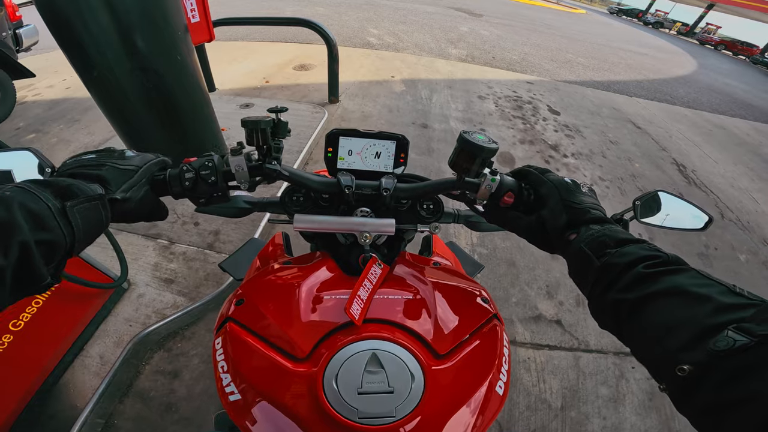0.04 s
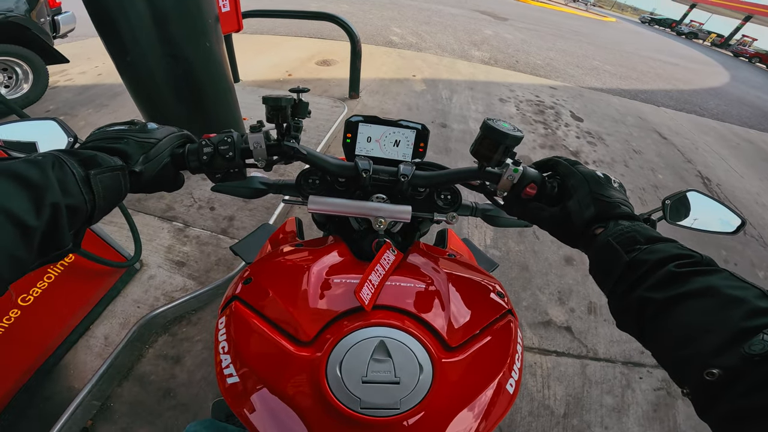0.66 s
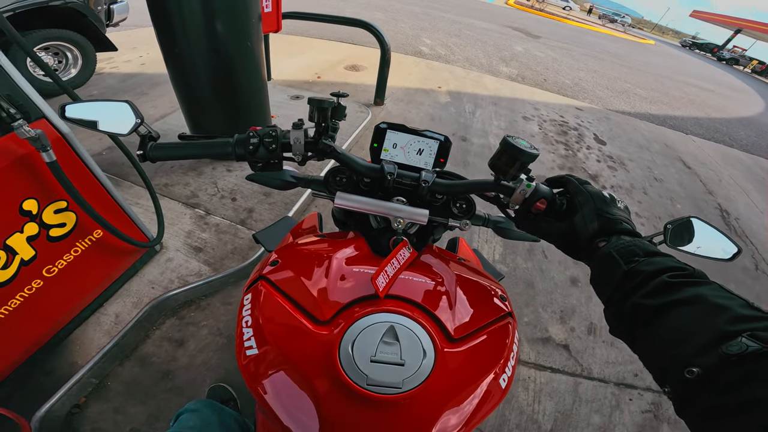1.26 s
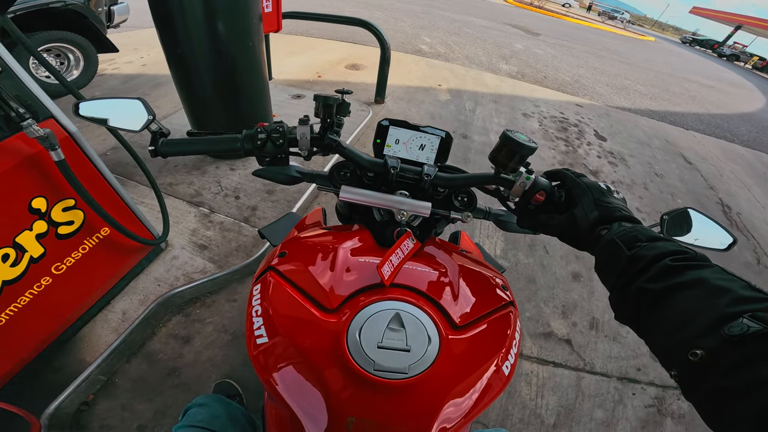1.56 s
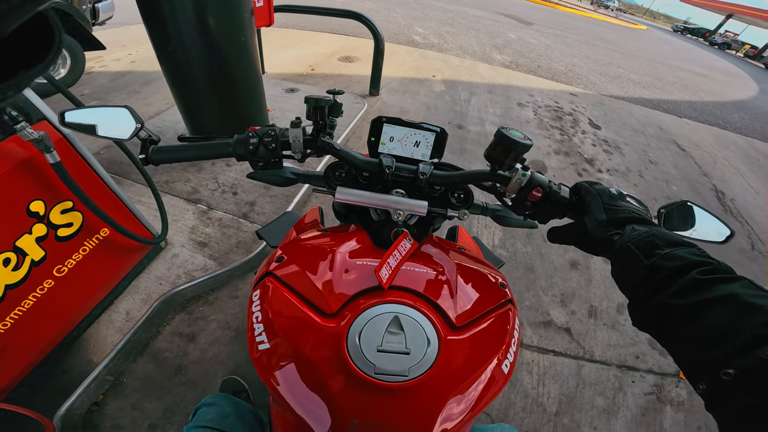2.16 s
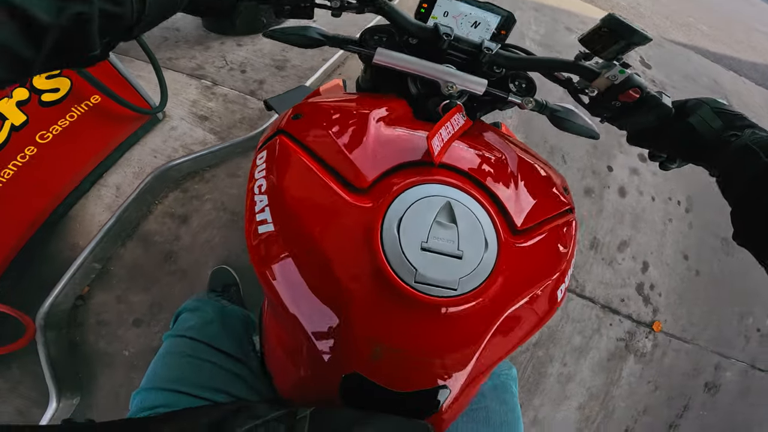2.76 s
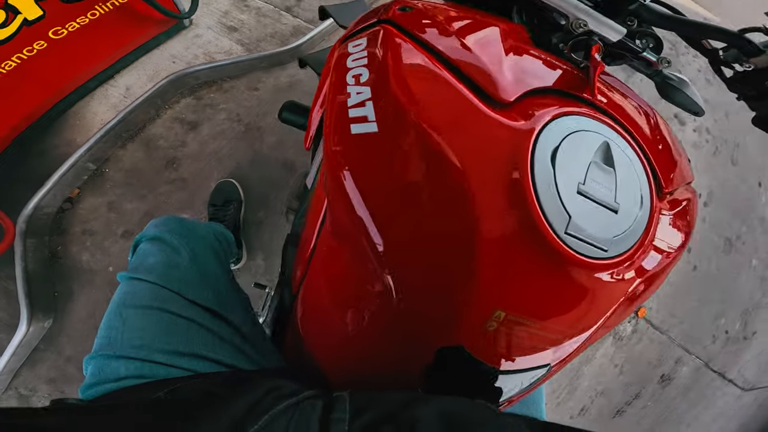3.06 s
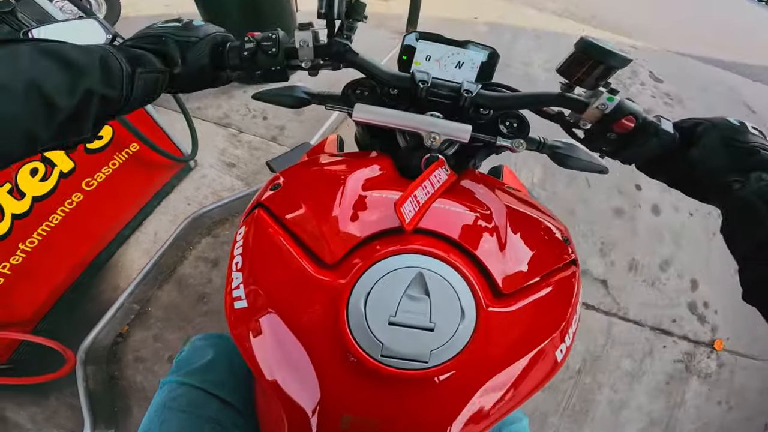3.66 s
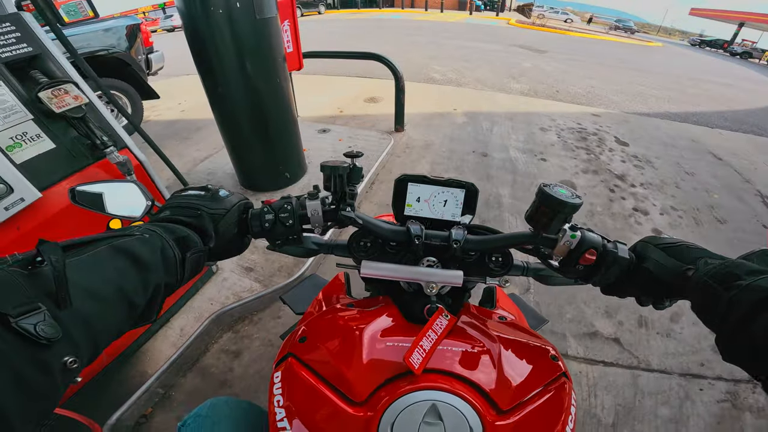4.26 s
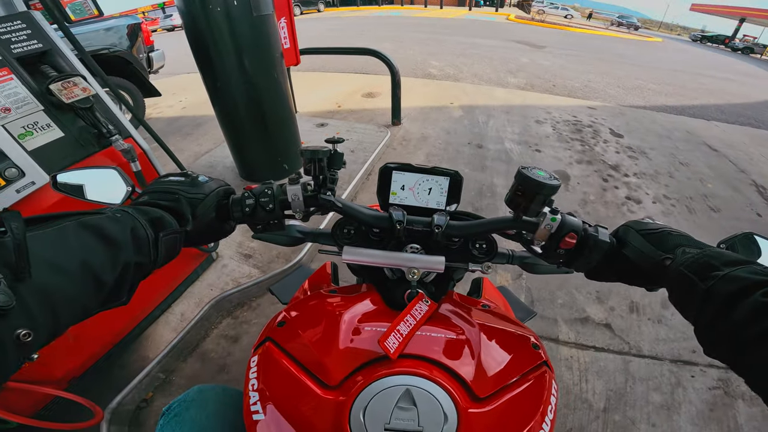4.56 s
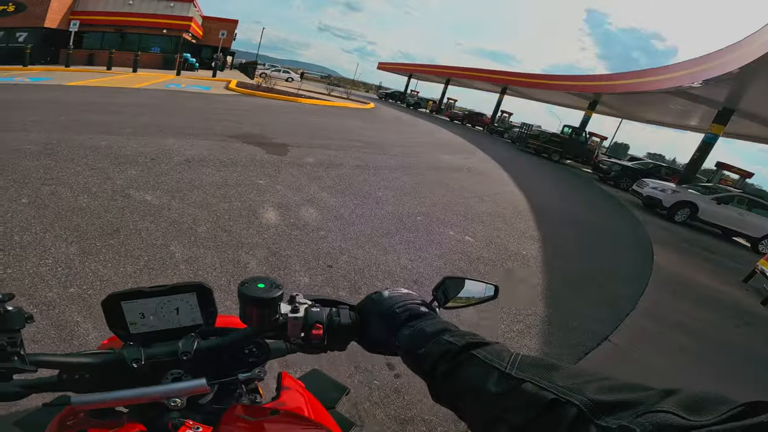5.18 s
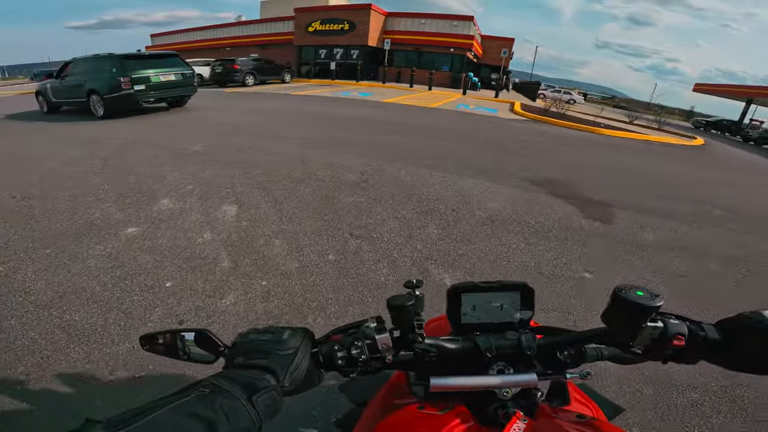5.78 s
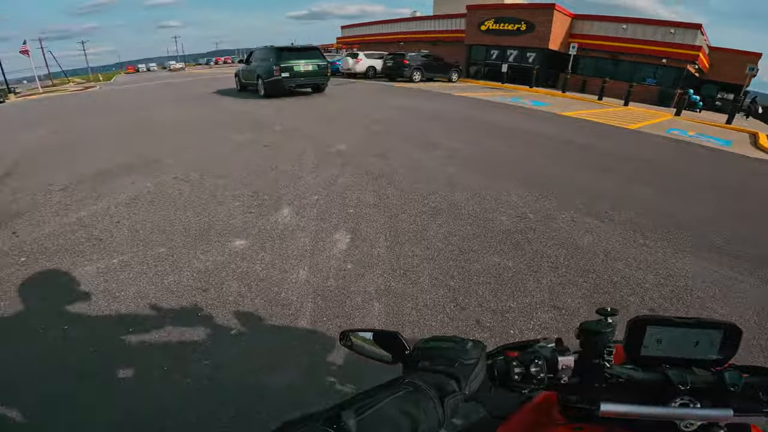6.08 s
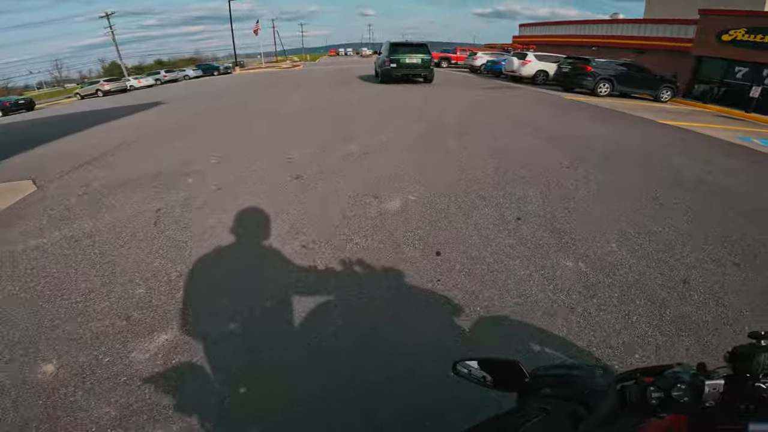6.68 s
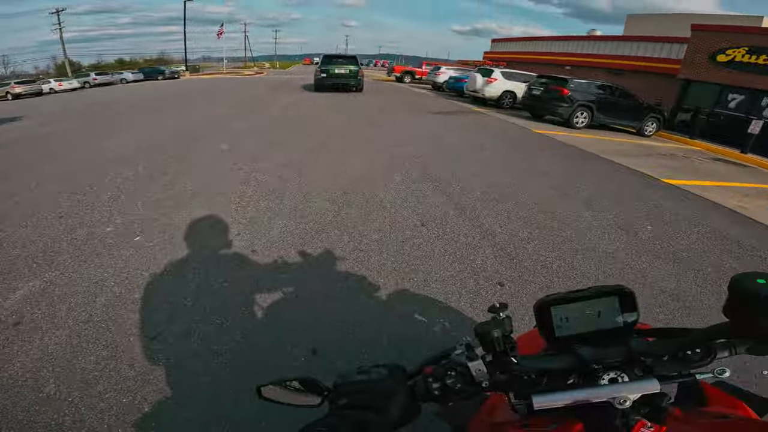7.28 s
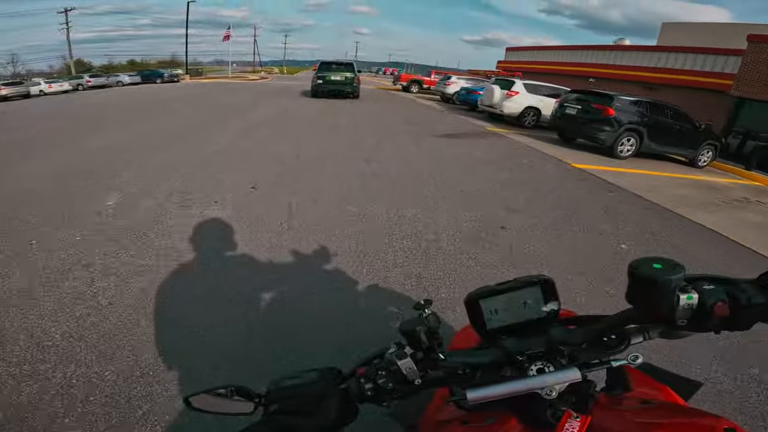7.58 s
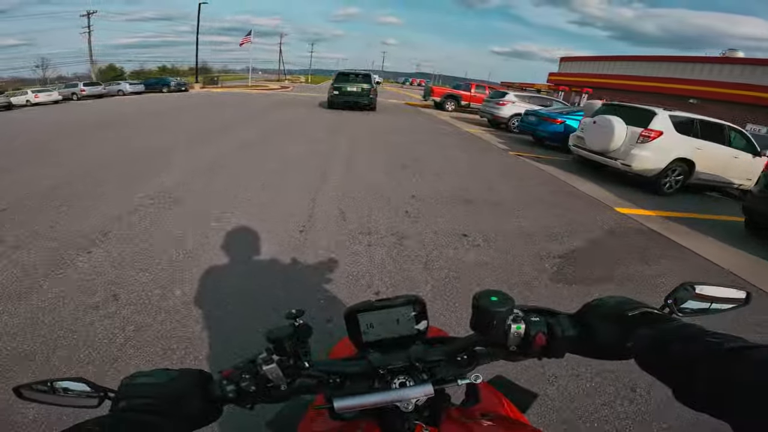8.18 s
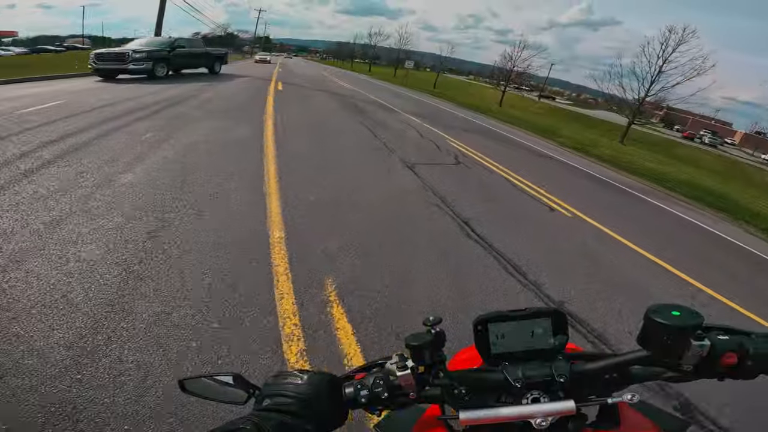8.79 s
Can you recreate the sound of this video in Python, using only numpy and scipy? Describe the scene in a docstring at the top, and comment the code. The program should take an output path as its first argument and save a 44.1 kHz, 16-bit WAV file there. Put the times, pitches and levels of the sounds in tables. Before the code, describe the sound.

Close up, a motorcycle starts with a grinding whine, settles into a deep uneven idle, then rides off with rising revs.

```python
"""A filling station forecourt, microphone on the rider's chest, an arm's length above a V4 motorcycle.
The starter grinds, the engine catches and settles into a lumpy idle, then pulls away under load, revs up
and falls back on a closed throttle; then an abrupt cut to the bike pulling on the road. Each firing
puffs through the pipes and silencer, gears whine and the valve train clatters in the case. The pump
island throws the idle back; traffic and a low hum fade down as the engine starts and idles."""
import sys
import numpy as np
from scipy import signal
from scipy.fft import rfft, irfft
from scipy.io import wavfile
from scipy.ndimage import uniform_filter1d, minimum_filter1d

SR = 44100
rng = np.random.default_rng(int(sys.argv[2]) if len(sys.argv) > 2 else 0)


def to_wav(s):
    """Save 16-bit WAV."""
    ch = np.atleast_2d(s).T  # columns
    pcm = np.round(np.clip(ch, -1, 1) * 32767)  # PCM
    wavfile.write(sys.argv[1], SR, pcm.astype(np.int16))


N = 389844
T = np.arange(N) / SR
STARTER_ON_S, STARTER_OFF_S, SPIN_UP_S, CATCH_S = .11, 1.06, .031, 1.032
BOOM_HZ, GEAR_TEETH = 62, 31.5  # the silencer's pitch; mesh cycles per crank turn

# spectrum of one exhaust pulse, throttle shut: f/Hz, level/dB
IDLE_PULSE = [(40, -14), (80, -0.5), (115, 2.5), (160, 1.5), (220, -.5), (280, 0.5), (335, 0.5),
              (440, -3.5), (560, -12.5), (680, -12.5), (850, -36), (1200, -53), (2500, -59)]
# fine hiss of the engine case and of cloth: f/Hz, level/dB
HISS_SPECTRUM = [(4000, -11.5), (6000, 1.5), (7500, -0.5), (9000, -3.5), (11000, -11), (15000, -25)]


def from_db(db):
    """Decibels to gain."""
    return 10 ** (np.asarray(db) / 20)


def in_time(rows):
    """A curve of (t/s, value) points, one value a sample."""
    return np.interp(T, *np.transpose(rows))


def held(start_s, end_s, edge_s):
    """Rises from the start, holds at 1 and falls after the end."""
    return np.clip((T - start_s) / edge_s, 0, 1) * np.clip(1 - (T - end_s) / edge_s, 0, 1)


def swell(s, half_s):
    """A smooth bump of height 1."""
    return np.exp(-np.minimum(((T - s) / half_s) ** 2, 50))


def dying(s, db, t60, rise_s=.00043):
    """A quick rise and an exponential fade."""
    rise = np.clip((T - s) / rise_s, 0, 1) ** 2
    return rise * from_db(db - 60 * np.clip(T - s - rise_s, 0, 1) / t60)


def strikes(rows):
    """One click for each (t/s, level/dB)."""
    clicks = np.zeros(N)
    for s, db in rows:
        clicks[int(s * SR)] = from_db(db)
    return clicks


def drift(rate_hz):
    """A random wander with spread 1."""
    knots = rng.standard_normal(N // 10)
    return np.interp(T * rate_hz, np.arange(len(knots)), knots) / np.sqrt(2 / 3)


def body(x, colour):
    """Minimum-phase filter with the spectrum (f/Hz, level/dB), rolling off beyond its ends."""
    hz, db = np.transpose(colour)
    grid = np.log(np.maximum(np.fft.rfftfreq(8192, 1 / SR), 1))
    beyond = np.maximum(np.log(hz[0]) - grid, 0) + np.maximum(grid - np.log(hz[-1]), 0)
    cepstrum = irfft(np.log(from_db(np.interp(grid, np.log(hz), db) - 20 * beyond)))
    lag = np.arange(len(cepstrum))
    causal = cepstrum * (1 + np.sign(lag)) * (lag < len(lag) / 2)
    return signal.oaconvolve(x, irfft(np.exp(rfft(causal))))[:N]


def noise(colour):
    """Noise with the spectrum (f/Hz, level/dB), rms 1."""
    x = body(rng.standard_normal(N), colour)
    return x / x.std()


def resonance(x, hz, width_hz):
    """Two-pole band-pass."""
    r = np.exp(-np.pi * width_hz / SR)
    poles = [1, -2 * r * np.cos(2 * np.pi * hz / SR), r * r]
    return signal.lfilter([1, 0, -1], poles, x + 1e-18) * (1 - r * r) / 2


def narrow_noise(hz, width_hz):
    """Noise twice through one resonance, rms 1."""
    ring = resonance(resonance(rng.standard_normal(N), hz, width_hz), hz, width_hz)
    return ring / ring.std()


def smeared(x, hz, width_hz):
    """All-pass: a pipe resonance holds back the upper part of a pulse and rounds it into a thump."""
    r = np.exp(-np.pi * width_hz / SR)
    poles = [1, -2 * r * np.cos(2 * np.pi * hz / SR), r * r]
    return signal.lfilter(poles[::-1], poles, x)


def evened(x, span_s):
    """Rms near 1 over the span, while single pulses keep their shape."""
    size = max(int(span_s * SR), 2)
    power = uniform_filter1d(uniform_filter1d(x * x, size), size)
    return x / np.sqrt(np.abs(power) + np.mean(x * x) / 1000)


def echoes(x, rows):
    """The sound plus a copy for each (delay/s, gain)."""
    return x + sum(share * np.interp(T - s, T, x, left=0) for s, share in rows)


def scatter(x, t60):
    """Dense dying reflections from pipes, fairing and ground, as strong as the sound that feeds them."""
    t = T[:SR // 2]
    tail = rng.standard_normal(len(t)) * from_db(-60 * t / t60) * (t > .005)
    wet = signal.oaconvolve(x, tail)[:N]
    return wet * x.std() / wet.std()


def surroundings(in_open, hum_hz=79, hum_db=-26, traffic_db=-34):
    """Traffic and a low hum fade down as the engine starts and idles; air rumbles on the microphone."""
    # air on the microphone: f/Hz, level/dB
    air_colour = [(15, 0), (30, 0), (45, 1.5), (70, -8.5), (150, -16), (400, -50.5)]
    # traffic around the forecourt: f/Hz, level/dB
    traffic_colour = [(85, 4), (130, -11), (200, -8.5), (400, -20), (900, -13.5), (1500, -25.5),
                      (2500, -38), (6000, -53)]
    # fade of traffic and hum: t/s, level/dB
    forecourt_fade = [(.6, 0), (4.7, -19.5)]
    air_db = -32.5 + 4 * in_open - 4.5 * drift(3)
    hum = from_db(hum_db + 8.5 * drift(17)) * np.sin(2 * np.pi * hum_hz * T + 2.76 * drift(9.8))
    traffic = from_db(traffic_db) * noise(traffic_colour)
    return from_db(in_time(forecourt_fade)) * (hum + traffic) + from_db(air_db) * noise(air_colour)


def rustles():
    """The rider's clothes brush the bike, close to the microphone."""
    # swishes of cloth: t/s, level/dB, half length/s
    swishes = [(3.046, -59.5, 0.26), (4.27, -62, 0.16)]
    return sum(from_db(db) * swell(s, half) for s, db, half in swishes) * noise(HISS_SPECTRUM)


def squeak(start_s=4.89, length_s=.19, db=-53):
    """A brief thin squeak as the bike begins to roll: a narrow, rough ring."""
    envelope = held(start_s, start_s + length_s, edge_s=.04)
    return from_db(db) * envelope * narrow_noise(hz=3750, width_hz=350)


def case_ring(x):
    """The engine case's resonances, as strong as the sound that feeds them."""
    # modes of the case: f/Hz, width/Hz, level/dB
    modes = [(1350, 23, 7), (1556, 98, -1.5), (2870, 48, -0.5), (3150, 65, -3), (3600, 27, -13.5),
             (4360, 280, -8.5), (4610, 90, -10), (5540, 83, -21), (7250, 65, -22)]
    ring = sum(from_db(db) * resonance(x, hz, width) for hz, width, db in modes)
    ring = body(ring, [(800, 6), (5000, -3.5), (9000, -16)])
    return ring * x.std() / ring.std()


def knocks(ring_db=-13.5):
    """The solenoid's snap, metallic rattles that ring the case, and two sharp clicks, the second as the scene
    cuts to the road."""
    # knocks of starter clutch and controls: t/s, level/dB, t60/s, rise/s
    hits = [(0.408, -18.5, .14, .001), (.634, -21.5, 0.14, .001), (.728, -21.5, .23, .001),
            (.794, -19, 0.13, 0.004), (1.021, -21, 0.059, .002), (1.045, -24.5, 0.19, 0.0011),
            (1.705, -29, 0.12, .001), (1.973, -24, 0.098, 0.0015), (3.943, -27.5, 0.061, 0.0013),
            (3.978, -31, .23, 0.0016), (4.173, -21, 0.13, 0.0092), (4.258, -28, 0.14, 0.0033)]
    # their metallic rattle: f/Hz, level/dB
    rattle_colour = [(200, 7), (800, 8.5), (1400, 7), (2000, -1), (2600, -5), (3300, -6), (4500, -12.5),
                     (6000, -31.5), (8200, -22.5), (11000, -43.5), (15000, -51)]
    # the solenoid's bright snap: f/Hz, level/dB
    snap_colour = [(1200, -19), (2000, 11), (3000, -4), (4500, 1), (6300, -7), (8500, -8), (12000, -40)]
    # sharp clicks: t/s, level/dB
    tick_hits = [(4.733, -3), (8.603, -14.5)]
    white = rng.standard_normal(N)
    bursts = white * sum(dying(*hit) for hit in hits)
    rattles = body(bursts, rattle_colour) / body(white, rattle_colour).std()
    snap = dying(STARTER_ON_S, db=-29.5, t60=.076) * noise(snap_colour)
    ticks = signal.lfilter([1], [1, -.85], strikes(tick_hits))
    return snap + rattles + from_db(ring_db) * case_ring(bursts) + ticks


def starter(free_hz=1993, sag_hz_per_s=7400, strain_s=.022, whirr_s=.048, brush_fade_s=.029):
    """Rough gear whine that sags on each compression, over a growl, fizzing brushes and gulps of air."""
    # compressions against the starter: t/s, mesh f/Hz, whine level/dB, run-up/s
    compressions = [(0.356, 1330, -26.5, 0.18), (0.591, 1620, -32, 0.039), (0.657, 1395, -30, 0.015),
                    (0.752, 1460, -35, 0.0083), (0.979, 1560, -30.5, 0.045)]
    # cylinders pumping air: t/s, level/dB, f/Hz, half length/s
    air_gulps = [(.25, -23, 60, .06), (.485, -12, 60, .042), (.73, -13, 60, .042), (.87, -11, 58, .05)]
    hz = free_hz * (1 - np.exp(-np.maximum(T - STARTER_ON_S, 0) / SPIN_UP_S))
    strain = from_db(-69) + from_db(-37) * swell(STARTER_ON_S + whirr_s, whirr_s / 2)  # spin-up whirr
    brushes = 0
    for s, pitch, db, run_up_s in compressions:
        dragged_hz = np.minimum(hz, pitch - sag_hz_per_s * (T - s))
        hz = np.where(T < s + 2 * strain_s, dragged_hz, hz)
        strain = strain + from_db(db) * swell(s, strain_s)
        brushes = brushes + held(s - run_up_s - brush_fade_s, s, brush_fade_s)
    mesh = 2 * np.pi * np.cumsum(hz) / SR + .6 * drift(400)
    whine = strain * sum(from_db(db + 3 * drift(200)) * np.sin(k * mesh + .5 * drift(700))
                         for k, db in enumerate([5, -6, -17, -25], start=1))
    gulps = sum(from_db(db) * swell(s, half) * np.sin(2 * np.pi * pitch * (T - s))
                for s, db, pitch, half in air_gulps)
    growl_colour = [(60, 15.5), (130, 4), (210, 9), (300, 8), (600, -17), (1000, -3.5), (2000, -21)]
    growl = from_db(-33 + drift(19.4)) * noise(growl_colour)
    fizz = from_db(-50) * brushes * noise([(3000, -22), (5500, 7), (7600, 5), (8800, -8), (11000, -29)])
    housing = from_db(-42) * narrow_noise(hz=1430, width_hz=80)
    return held(STARTER_ON_S, STARTER_OFF_S, .01) * (whine + growl + fizz + housing) + gulps


def gear_rasp(cycle, width_hz=330):
    """Under load the teeth chatter: a broad rasp around twice the mesh rate."""
    # t/s, level/dB
    level = [(5.2, -75.5), (5.5, -59.5), (5.9, -42.5), (6.15, -61.5), (6.95, -50.5), (7.2, -61),
             (7.4, -83)]
    phase = 4 * np.pi * cycle * 2 * GEAR_TEETH
    chatter = drift(width_hz) * np.sin(phase) + drift(width_hz) * np.cos(phase)
    return from_db(in_time(level)) * chatter


def gears(cycle, base_db=-49, cam_order=137, flutter_rad=1.5, flutter_hz=171.6):
    """Primary and cam gears sing in rough bursts as each firing jerks the crank."""
    # the whine, fading as the teeth unload: t/s, relative level/dB
    level = [(1.5, -9), (1.8, 4.5), (2.25, 5.5), (2.6, -12.5), (3.6, -14.5), (3.95, 0), (5.4, 7.5),
             (5.88, 3.5), (6.15, 3.5), (6.9, 2), (7.4, 7.5), (7.8, -3), (7.9, -6.5), (8.3, -20), (8.45, 6)]
    # how the case radiates the mesh tones: f/Hz, level/dB
    radiation = [(700, -8.5), (950, -4.5), (1100, 4.5), (1230, -5.5), (1400, 2), (1700, -0.5), (1900, -3),
                 (2080, 0.5), (2280, -5), (2480, -20.5), (3000, -11.5), (3800, -21.5), (4700, -15),
                 (5300, -21), (6000, -40)]
    crank = 4 * np.pi * cycle + .03 * np.sin(4 * np.pi * cycle)
    tones = sum(np.sin(order * crank + flutter_rad * drift(flutter_hz * np.sqrt(order / GEAR_TEETH)))
                for order in (GEAR_TEETH, 2 * GEAR_TEETH, cam_order))
    bursts_db = 3 * np.cos(2 * np.pi * cycle - 2) + 2 * np.cos(4 * np.pi * cycle - 1) + 2.5 * drift(120)
    return body(tones * from_db(base_db + in_time(level) + bursts_db) * (T > CATCH_S), radiation)


def valves(cycle, in_open):
    """Eight valve taps a cycle, no two alike, keep the case ringing; softer out in the open."""
    seated = np.diff(np.floor(8 * cycle), prepend=0) * (T > CATCH_S)
    ring = case_ring(seated * rng.uniform(.17, 1, N) * rng.choice([-1, 1], N))
    return from_db(-50.5 - 5 * in_open) * ring / ring.std()


def engine_case(cycle, effort, in_open, cranking_fade_s=.13, road_cut_s=8.6):
    """The valve train clatters in step with the camshafts, louder with effort and beside the pumps."""
    # the case from the seat: f/Hz, level/dB
    case_colour = [(400, 10), (800, 6), (1100, 3), (1400, 4.5), (1800, -1), (2200, -2.5), (2650, -10.5),
                   (3150, -7), (3900, -14), (4700, -17), (5800, -26), (8000, -41)]
    # its flank, which rings higher: f/Hz, level/dB
    flank_colour = [(400, 12), (800, 8), (1250, -3), (1800, -0.5), (2100, -1), (2400, -2.5), (2750, -8),
                    (3150, -6.5), (3800, -11.5), (4650, -7.5), (5300, -18.5), (5900, -24.5), (8000, -44)]
    cranking = np.exp(-np.maximum(T - STARTER_OFF_S, 0) / cranking_fade_s)
    working = effort * (1 - cranking)
    clatter_db = -35.5 + 2 * working - 6 * in_open + 2.5 * cranking + 2.5 * (T > road_cut_s)
    hiss_db = -66 + 4.5 * working - 10.5 * in_open
    lean = swell(3.15, half_s=.71)  # the rider leans the microphone over the flank
    clatter = np.sqrt(1 - lean) * noise(case_colour) + np.sqrt(lean) * from_db(.5) * noise(flank_colour)
    throb_db = -.65 * np.cos(4 * np.pi * cycle - 2.5)
    tick_db = -.8 * np.cos(16 * np.pi * cycle)  # eight valve events a cycle
    beat = from_db(throb_db + tick_db + 1.7 * drift(150))
    beat = beat / np.sqrt(np.mean(beat ** 2)) * held(STARTER_ON_S, T[-1], SPIN_UP_S)
    return beat * (from_db(clatter_db) * clatter + from_db(hiss_db) * noise(HISS_SPECTRUM))


def silencer(clicks):
    """Pulses pump the silencer's low, narrow resonance into a boom."""
    return resonance(resonance(clicks, BOOM_HZ, width_hz=16), BOOM_HZ, width_hz=6)


def hard_firings(echo_db=-6, thump_db=-1, boom_db=-14):
    """Single strong bangs through the pipes and silencer, with a deep, rounded thump."""
    # as the engine catches, as the clutch bites and on the overrun: t/s, level/dB
    hits = [(1.032, -7), (1.046, -1.5), (1.065, -5.5), (1.125, 2), (1.151, -3), (1.18, 0), (1.193, -4),
            (1.261, -1), (1.294, -2), (1.372, 2), (1.407, -2.5), (5.104, -8), (5.233, -4.5), (5.316, -11.5),
            (7.978, -10.5), (8.171, -8), (8.194, -6.5), (8.29, -7), (8.314, -9.5)]
    pulse_peak = np.abs(body(strikes([(0, 0)]), IDLE_PULSE)).max()
    clicks = -strikes(hits) / pulse_peak
    thump = from_db(thump_db) * body(clicks, [(50, -8), (110, 3.5), (230, 2), (400, -14)])
    bangs = body(clicks, IDLE_PULSE) + thump
    return bangs + from_db(echo_db) * scatter(bangs, t60=.2) + from_db(boom_db) * silencer(clicks)


def firings(cycle, effort, warming, load):
    """One puff per opening exhaust valve: two close pairs a cycle, each led by a longer, earlier puff."""
    # warming up, idling, pulling: four crank angles/deg, four levels/dB, long puff/s, its head start/s
    cylinders = [((14, 93.5, 306, 382), (-9, -1, -10, 0), .0017, .0016), ((14, 93.5, 306, 382),
                 (-9, -2, -9, 0), .0017, .0016), ((18, 93.5, 308, 382), (-8, -3, -5, 0), .0015, .0018)]
    # uneven firing, steadier under load: effort, spread/dB in level and /deg in timing
    unevenness = [(-1, 2.8), (0, 1.1), (.7, .3)]
    spread = np.interp(effort, *np.transpose(unevenness))
    shares = warming, (1 - warming) * (1 - load), (1 - warming) * load
    puffs = np.zeros(N)
    for k in range(4):
        late_deg, strength = spread * drift(16), from_db(spread * drift(25))
        for share, (angles, dbs, length_s, lead_s) in zip(shares, cylinders):
            opened = np.diff(np.floor(cycle - (angles[k] + late_deg) / 720), prepend=0) > 0
            clicks = opened * (T > CATCH_S) * share * strength * from_db(dbs[k])
            if k % 2 == 0:
                clicks = uniform_filter1d(np.roll(clicks, -int(lead_s * SR)), size=int(length_s * SR))
            puffs += clicks
    return puffs


def idle_bark(clicks, effort, warming, load, starved_puff_s=.0016, island_db=-1):
    """Throttle shut: round thumps, rounder while warming up, thrown back by the pump island."""
    starved = np.sqrt(np.clip(-effort, 0, 1))  # a starved cylinder puffs longer and duller
    soft = uniform_filter1d(clicks, size=int(starved_puff_s * SR))
    bark = body(clicks * (1 - load - starved) + soft * starved, IDLE_PULSE)
    late_burn = smeared(bark * warming, hz=280, width_hz=150)
    bark = smeared(bark * (1 - warming) + late_burn, hz=400.6, width_hz=245)
    bark = echoes(bark, [(.0254, .15), (.0286, -.14)])  # off the pumps
    return bark + from_db(island_db) * scatter(bark, t60=.94)


def load_bark(clicks, rpm, heat_rpm=(2230, 3130), blare_rpm=3650, lot_db=-15):
    """Throttle open, out on the lot: hotter gas lifts the pipes' resonances as the revs rise."""
    # one pulse under load, at the lower heat_rpm: f/Hz, level/dB
    load_pulse = [(50, -7), (90, -8), (135, -4), (175, 1), (230, -4), (290, 0), (370, -5), (460, -10),
                  (550, -24), (660, -25), (790, -42), (1200, -47), (2500, -68), (7000, -105)]
    # the pulse hardened into a blare at the top of the revs: f/Hz, level/dB
    blare_pulse = [(60, -2), (110, -7.5), (170, -4.5), (230, -2), (330, 2), (410, 3), (500, -1.5),
                   (600, -15), (720, -25), (850, -20.5), (1050, -32), (1500, -38), (2500, -49.5),
                   (7000, -84.5)]
    pulses = [[(hz * (revs / heat_rpm[0]) ** .25, db) for hz, db in load_pulse] for revs in heat_rpm]
    bark = 0
    for pulse, corner in zip(pulses + [blare_pulse], np.eye(3)):
        share = np.interp(rpm, [*heat_rpm, blare_rpm], corner)
        bark = bark + body(clicks * share, pulse)
    in_pipes = echoes(bark, [(.01, -.17), (.0242, -.1)])
    return in_pipes + from_db(lot_db) * scatter(bark, t60=.56)


def exhaust(cycle, rpm, effort, warm_s=2.4, idle_rpm=1500):
    """Each pulse swings low, then high, rings in the pipes and pumps the silencer's boom."""
    # the exhaust at each effort: effort, bark level/dB, boom level/dB
    response = [(-0.88, -20.5, -21), (0.055, -11, -13), (0.55, -8.5, -44.5)]
    load = np.clip(effort, 0, 1)
    warming = 1 - held(warm_s, T[-1], .04)
    efforts, *levels = np.transpose(response)
    bark_db, boom_db = [np.interp(effort, efforts, level) for level in levels]
    bark_db -= 2.5 * np.log2(rpm / idle_rpm) * (1 - np.abs(effort))  # a faster idle barks softer
    boom_db += 16 * load * np.exp(-((rpm - 60 * BOOM_HZ) / 240) ** 2)  # crank at the silencer's pitch
    clicks = -firings(cycle, effort, warming, load)
    bark = idle_bark(clicks, effort, warming, load) + load_bark(clicks * load, rpm)
    envelope = np.sqrt(np.abs(uniform_filter1d(bark * bark, size=700)))
    bark += envelope * noise(IDLE_PULSE) * from_db(-14 - 12 * load)  # turbulent gas with each pulse
    rush = from_db(-35.5) * load * narrow_noise(hz=631.4, width_hz=61)  # gas through the tailpipe
    boom = from_db(boom_db) * evened(silencer(clicks), span_s=.037)
    return rush + from_db(bark_db) * evened(bark, span_s=.83) + boom


def scene(leave_s=4.8):
    """One microphone riding with the bike; the running engine follows one crank and its effort."""
    # the crank, jumping at the cut to the road: t/s, speed/rpm
    crank_speed = [(1.29, 1055.0), (1.57, 1541.0), (2.04, 1626.0), (2.5, 1574.0), (2.8, 1506.0),
                   (3.0, 1469.0), (3.27, 1456.0), (3.73, 1359.0), (3.95, 1370.0), (4.2, 1441.0),
                   (4.47, 1452.0), (4.98, 1496.0), (5.26, 1238.0), (5.5, 2235.0), (5.6, 2149.0),
                   (5.75, 2173.0), (5.88, 1976.0), (6.05, 2066.0), (6.17, 1933.0), (6.3, 1985.0),
                   (6.6, 2098.0), (6.94, 2178.0), (7.1, 2370.0), (7.25, 2506.0), (7.42, 2639.0),
                   (7.55, 2923.0), (7.69, 3160.0), (7.8, 3882.0), (7.84, 3915.0), (8.0, 2960.0),
                   (8.17, 2055.0), (8.3, 1982.0), (8.43, 1679.0), (8.59, 1676.0), (8.61, 2893.0)]
    # how hard the engine works: t/s, effort (-1 starved, 0 idling, 1 pulling)
    engine_effort = [(1.3, -0.85), (1.6, 0.11), (1.8, -0.093), (4.88, -0.24), (5.08, -1), (5.2, -0.66),
                     (5.33, -0.082), (5.45, 0.87), (7.8, 0.89), (7.83, -0.098), (7.85, -0.55), (8.12, -1.1),
                     (8.59, -0.18), (8.61, 0.68)]
    rpm = in_time(crank_speed)
    effort = np.clip(in_time(engine_effort), -1, 1)
    cycle = np.cumsum(rpm) / (120 * SR)  # a cycle is two turns
    in_open = held(leave_s, T[-1], edge_s=1.23)  # rolling from the pump island onto the open lot
    pipes = exhaust(cycle, rpm, effort) + hard_firings()
    works = engine_case(cycle, effort, in_open) + gears(cycle) + gear_rasp(cycle) + valves(cycle, in_open)
    return (pipes + works + starter() + squeak() + knocks() + rustles() + surroundings(in_open))[None]


def record(dry, ceiling=.92, cutoff_hz=15700):
    """A look-ahead limiter holds the peaks; a steep low-pass cuts the top."""
    gain = np.minimum(1, ceiling / (np.abs(dry) + 1e-9))
    gain = uniform_filter1d(minimum_filter1d(gain, size=200), size=200)
    return signal.sosfilt(signal.ellip(10, .1, 80, cutoff_hz, fs=SR, output="sos"), dry * gain)


dry = scene()
out = record(dry)
to_wav(out)
```